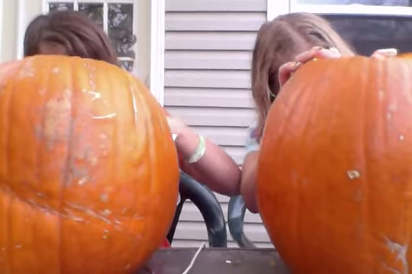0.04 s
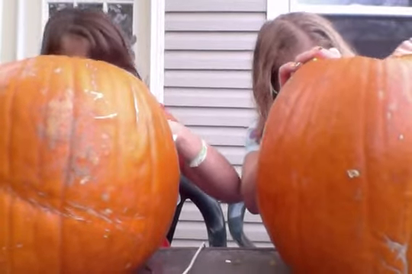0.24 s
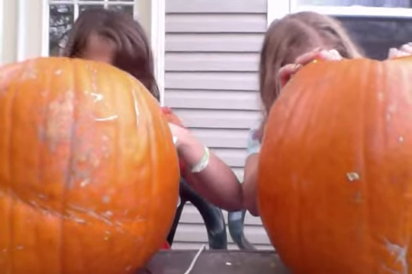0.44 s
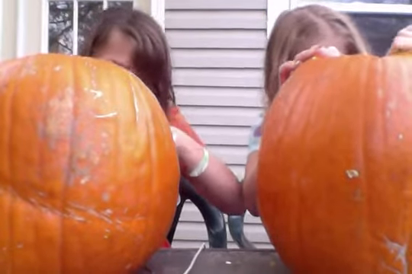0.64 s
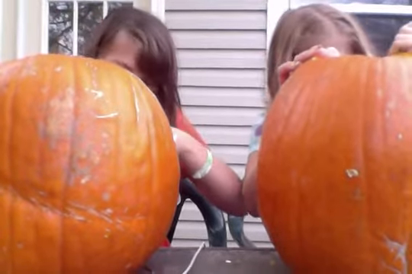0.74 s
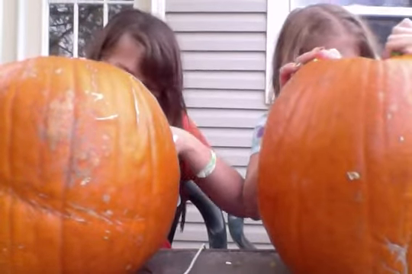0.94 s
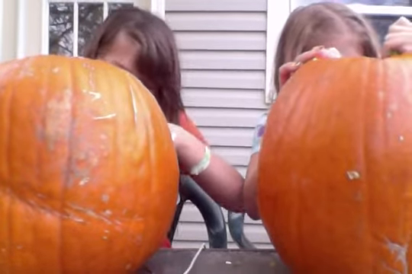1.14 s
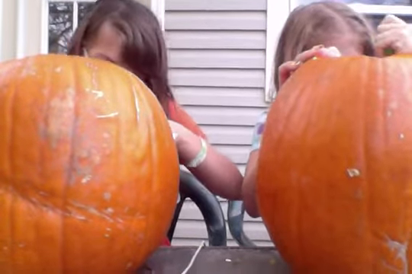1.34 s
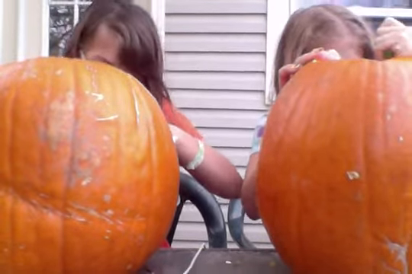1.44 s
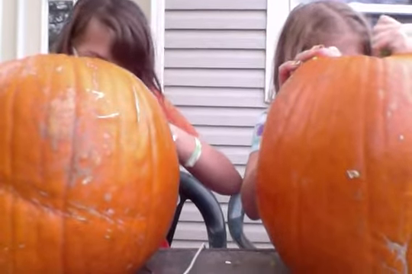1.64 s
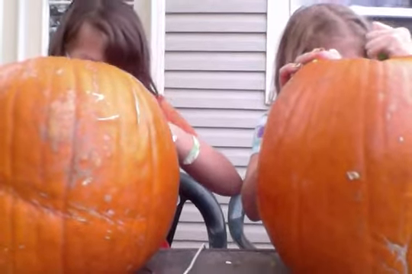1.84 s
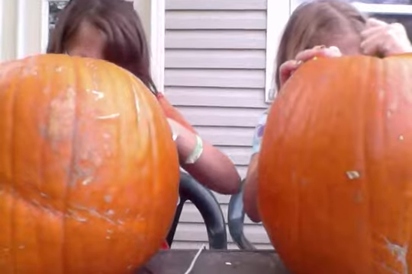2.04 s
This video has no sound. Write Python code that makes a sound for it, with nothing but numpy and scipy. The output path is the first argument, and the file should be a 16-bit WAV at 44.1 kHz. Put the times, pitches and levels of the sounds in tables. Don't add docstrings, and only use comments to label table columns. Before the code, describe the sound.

A knife cuts into a hollow pumpkin, close, outdoors. Soft air and a faint press open; at 0.2 s a round thump leads into dense bright knocks and wet tearing until 0.4. A double knock falls at 0.6, then near quiet. Low thumps and light knocks come at 1.1-1.3, two knocks with a thin faint squeak around 1.45, a hollow push at 1.65, and final knocks at 1.73-1.85.

```python
import sys
import numpy as np
from scipy import signal
from scipy.fft import rfft, irfft
from scipy.io import wavfile
from scipy.ndimage import uniform_filter1d

SR = 44100
rng = np.random.default_rng(int(sys.argv[2]) if len(sys.argv) > 2 else 0)


def master_out(mix):
    frames = np.transpose(np.atleast_2d(mix))
    ceiling = np.clip(frames, -1, 1)
    pcm = np.round(ceiling * 32767).astype(np.int16)
    wavfile.write(sys.argv[1], SR, pcm)


def boost(x):
    u = np.asarray(x, float) / 20
    return 10 ** u


N = 92610


def evened(x):
    return x / np.sqrt(np.mean(x ** 2) + 1e-20)


def wander(count, smooth):
    return evened(uniform_filter1d(rng.standard_normal(count), smooth))


def add(mix, start_s, sound):
    part = mix[round(start_s * SR):][:len(sound)]
    part += sound[:len(part)]


def colour(x, points, edge_hz=2e4):
    hz = np.fft.rfftfreq(len(x), 1 / SR) + 1
    f, db = np.transpose(points)
    shape = np.interp(np.log(hz), np.log(f), db, -120)
    fall = -63 * np.maximum(np.log2(hz / edge_hz), 0)
    return irfft(rfft(x) * boost(shape + fall), len(x))


def resonate(x, hz, width_hz):
    turn = np.exp(2j * np.pi * np.cumsum(hz * np.ones(len(x))) / SR)
    r = np.exp(-np.pi * width_hz / SR)
    return 2 * (turn * signal.lfilter([1 - r], [1, -r], x / turn)).real


# [f/Hz, density/dB per Hz]
AIR_SPECTRUM = [(15, -84), (25, -15), (148, 4.5), (648, -5.5), (762, -3), (1080, -6), (1750, -6),
                (5140, -12.5), (15500, -39)]
# [t/s, level/dB]
BREEZE_DRIFT = [(0, -1.5), (.17, -5), (.5, 1), (.75, 0), (1.2, -3), (1.6, 0), (2.1, -2.5)]


def air():
    swell = boost(0.5 * wander(N, 3000))
    drift_db = np.interp(np.arange(N) / SR, *np.transpose(BREEZE_DRIFT))
    return boost(-64 + drift_db) * swell * evened(colour(rng.standard_normal(N), AIR_SPECTRUM))


def porch(x):
    level_db, t60_s = -22, 0.54
    t = np.arange(30000) / SR
    tail = rng.standard_normal(30000) * np.minimum(t / 0.01, 1) * boost(-60 * t / t60_s)
    return boost(level_db) * signal.fftconvolve(x, tail / np.linalg.norm(tail))[:N]


# [t/s, level/dB]
HAND_PRESSURE = [(0, -63.5), (.07, -53.5), (.12, -67), (.2, -76), (0.229, -44), (.34, -45.5), (.38, -64),
                 (.6, -58.5), (.95, -77.5), (1.1, -56.5), (1.202, -82), (1.252, -45), (1.316, -46.5),
                 (1.39, -64), (1.55, -55), (1.63, -64.5), (1.75, -47.5), (2.05, -76.5)]
# [f/Hz, width/Hz, level/dB]
TABLE_MODES = [(92.8, 44, -11), (142, 78, -1), (200, 73, 0), (288.6, 33, -5.5), (383, 164, -4),
               (503, 56, -12.5)]


def rumble():
    t = np.arange(N) / SR
    s, db = np.transpose(HAND_PRESSURE)
    lumps = boost(2.0 * wander(N, 500))
    drive = rng.standard_normal(N) * lumps
    body = 0
    for hz, width_hz, level_db in TABLE_MODES:
        mode = resonate(resonate(drive, hz, width_hz), hz, 1.4 * width_hz)
        body = body + boost(level_db) * evened(mode)
    return boost(np.interp(t, s, db)) * evened(body)


# [start t/s, rise/s, level/dB, centre f/Hz]
HAND_BRUSHES = [
    (.05, 0.018, -83.5, 8140),
    (0.496, 0.035, -69.5, 7900),
    (.57, 0.13, -71.5, 4500),
    (0.642, 0.029, -68.5, 8100),
    (0.81, 0.027, -95, 7900),
    (1.27, 0.027, -72, 7400),
]


def brush(start_s, rise_s, db, hz):
    t = np.arange(12000) / SR
    hiss = resonate(resonate(rng.standard_normal(12000), hz, 6500), hz, 6500)
    fade_db = -60 * (t - rise_s).clip(0) / 0.36
    return start_s, boost(db + fade_db) * np.minimum(t / rise_s, 1) * evened(hiss)


# [middle t/s, length/s, peak
# level/dB, f/Hz]
SHELL_ROCKS = [(.41, 0.011, -43.5, 440), (.5965, 0.013, -38, 448), (.617, 0.021, -47.5, 333),
               (.637, 0.02, -49, 400), (.641, 0.012, -50, 1060), (.651, 0.014, -53, 483),
               (.657, .014, -56, 1000), (1.437, 0.016, -42.5, 482), (1.805, 0.015, -46, 420),
               (1.005, 0.017, -64, 222), (1.04, 0.032, -56, 214), (1.06, .025, -56, 192),
               (1.078, 0.015, -57, 240), (1.096, 0.031, -46.5, 227), (1.129, 0.032, -51.5, 158),
               (1.146, 0.027, -51, 270), (1.175, 0.034, -58, 180), (1.273, 0.014, -36, 258),
               (1.742, 0.017, -35.5, 233), (1.762, 0.031, -38, 251)]


def rock(middle_s, length_s, db, hz):
    t = np.arange(round(length_s * SR)) / SR
    swell = np.sin(np.pi * t / length_s) ** 2
    return middle_s - length_s / 2, boost(db) * swell * np.cos(2 * np.pi * hz * (t - length_s / 2))


# [t/s, f/Hz, level/dB]
BLADE_SQUEAK = [
    (1.405, 3320, -80),
    (1.423, 3386, -53),
    (1.441, 3480, -62),
    (1.49, 3430, -58),
    (1.551, 3330, -67),
    (1.562, 3330, -82),
    (1.621, 3210, -72),
    (1.665, 3190, -72),
    (1.68, 3200, -74),
]


def squeak():
    t = np.arange(N) / SR
    s, hz, db = np.transpose(BLADE_SQUEAK)
    waver = 1 + 0.13 * wander(N, 150)
    level = boost(np.interp(t, s, db, -140, -140))
    turns = np.cumsum(np.interp(t, s, hz)) / SR
    return np.sqrt(2) * waver * level * np.sin(2 * np.pi * turns)


# [start t/s, level/dB, f/Hz, t60/s]
SHORT_TICKS = [(.318, -32.5, 5650, 0.037), (.319, -33, 1612, 0.074), (.3845, -32, 3264, 0.034),
               (.4028, -32, 3450, 0.023), (.305, -60, 8500, .08), (1.278, -39.5, 2900, 0.024),
               (.528, -69, 11000, 0.054), (.663, -61.5, 9620, 0.056), (.992, -63, 7400, .02),
               (1.012, -59, 6950, 0.029), (1.019, -63, 7700, 0.018), (1.018, -71, 5700, 0.028),
               (0.97, -78, 5540, .02), (1.111, -57.5, 5900, 0.021), (1.533, -62.5, 5900, 0.054),
               (1.7345, -52, 4750, .04), (1.7328, -35, 3800, 0.019), (1.7745, -40, 3460, .015),
               (.2408, -42, 3500, 0.013), (.3205, -33.5, 1900, .02), (0.25, -26.5, 3350, .012),
               (.3018, -31, 2900, .015), (.592, -38, 2280, 0.037), (1.2648, -36, 3400, 0.019),
               (1.4622, -39, 3600, 0.019), (.603, -42.5, 1200, 0.047), (1.295, -45, 2000, .03),
               (1.799, -53, 3400, 0.028), (1.829, -45.5, 3280, 0.024)]


def tick(start_s, db, hz, t60_s):
    t = np.arange(4000) / SR
    return start_s, boost(db - 60 * t / t60_s) * np.minimum(t / 0.0012, 1) * np.sin(2 * np.pi * hz * t)


# [start t/s, level/dB, centre f/Hz, t60/s]
SKIN_SPLITS = [
    (.2893, -55.5, 10100, 0.037),
    (.2945, -57, 14000, .04),
    (.2905, -41, 5000, .03),
    (.3185, -45, 5600, 0.027),
    (.381, -57, 5000, .04),
    (.403, -59, 4900, .03),
    (.3165, -59, 11500, .04),
    (.322, -56, 11000, 0.045),
    (1.276, -68, 8300, .02),
    (1.089, -69, 7900, .02),
]


def split(start_s, db, hz, t60_s):
    t = np.arange(4000) / SR
    hiss = resonate(resonate(rng.standard_normal(4000), hz, 0.4 * hz), hz, 0.4 * hz)
    hiss = colour(hiss, [(1, 0), (2e4, 0)], 14500)
    return start_s, boost(db - 60 * t / t60_s) * np.minimum(t / 0.00053, 1) * evened(hiss)


# [start t/s, length/s, level/dB, top edge f/Hz]
TEAR_STROKES = [(.2845, 0.0067, -34, 5940), (.2897, 0.0095, -36, 8900), (.306, 0.0065, -54, 6000),
                (.3165, 0.0062, -36.5, 7200), (.321, 0.0033, -42, 8000), (.337, 0.0094, -49, 7500),
                (.380, 0.011, -44, 5700), (.402, 0.0068, -44, 5240), (.59, 0.016, -48, 4200),
                (1.111, 0.011, -67, 8200), (1.287, 0.022, -57, 5300), (1.571, 0.0092, -62, 5070),
                (1.733, 0.0099, -46, 4700), (1.852, 0.0054, -60, 3820)]
# [f/Hz, density/dB per Hz]
TEAR_SPECTRUM = [(290, -5), (500, -16), (1390, -12), (1630, -7), (2500, -10.5), (2920, -10), (3320, -14.5),
                 (3720, -10.5), (15000, -34.5)]


def tear(start_s, length_s, db, edge_hz):
    rise_s, t60_s, fibres_per_s = 0.0011, 0.065, 4400
    t = np.arange(6000) / SR
    noise = rng.standard_normal(6000)
    strength = boost(0.97 * rng.exponential(1, 6000).clip(0, 3))
    snaps = noise * (1.2 + strength * (rng.random(6000) < fibres_per_s / SR))
    clumps = boost(3.5 * wander(6000, 70))
    shape = np.minimum(t / rise_s, 1) * boost(-60 * (t - length_s).clip(0) / t60_s)
    return start_s, boost(db) * shape * evened(colour(clumps * snaps, TEAR_SPECTRUM, edge_hz))


# [start t/s, peak level/dB, f/Hz, rebound/0-1]
SHELL_PUSHES = [
    (.069, -39.5, 180.4, 0.3),
    (.2112, -25, 369, 0.8),
    (1.111, -38.5, 365, 0.63),
    (1.2342, -26.5, 363, 0.34),
    (1.2955, -30.5, 229.6, 0.1),
    (1.311, -35.5, 200, 0.3),
    (1.527, -40, 303, 0.12),
    (1.573, -42, 322, 0.37),
    (1.6495, -30, 357.4, 0.77),
]
# [multiple of f, level/dB]
SHELL_OVERTONES = [(1.398, -10.5), (1.9, -22), (2.4, -20.5)]


def push(start_s, db, hz, rebound):
    rise_s, fall_s, sag = 0.0036, 0.0024, 0.049
    rebound_s, rebound_db, rebound_wide_s = 0.0187, 0.5, 0.00072
    t = np.arange(3000) / SR
    rise = np.sin(np.pi / 2 * t / rise_s) ** 2
    fall = np.exp(-((t - rise_s) / fall_s / 2) ** 2)
    shape = np.where(t < rise_s, rise, fall)
    u = (t - rebound_s) / rebound_wide_s
    bounce = boost(rebound_db) * (1 - 0.5 * u ** 2) * np.exp(-0.3 * u ** 2) * rebound
    turns = np.cumsum(hz * (1 + sag * (1 - t / rise_s).clip(-1))) / SR
    overtones = 0
    for multiple, level_db in SHELL_OVERTONES:
        ring = np.sin(2 * np.pi * multiple * hz * t)
        overtones = overtones + boost(level_db - 60 * t / 0.088) * np.minimum(t / 0.0045, 1) * ring
    return start_s, boost(db) * (bounce - shape * np.sin(2 * np.pi * turns) - overtones)


def bending_wave(t, db):
    start_hz, end_hz, glide_s, t60_s = 3700, 2000, 0.0025, 0.05
    turns = np.cumsum(end_hz + (start_hz - end_hz) * np.exp(-t / glide_s)) / SR
    return boost(db - 1 - 60 * t / t60_s) * np.minimum(t / 0.00055, 1) * np.sin(2 * np.pi * turns)


def scatter(rings, t):
    echoes = rng.standard_normal(6000) * boost(-60 * t / 0.098) * (rng.random(6000) < 0.06)
    echoes = signal.lfilter(*signal.butter(2, 2400, fs=SR), echoes / np.linalg.norm(echoes))
    return boost(0.5) * signal.fftconvolve(rings, echoes)[:len(rings)]


# [t/s, peak level/dB, hollow level/dB, brightness/dB per octave, bending level/dB]
BLADE_KNOCKS = [(0.2404, -28, -2.5, 4, 0), (0.2518, -29, -1.5, -5.5, -4), (0.2745, -26.5, -3.5, 6, -2),
                (0.2848, -19, -9.5, 21, -5), (0.2934, -18.5, -12.5, 17, -2), (.2975, -20.5, -10.5, 15, -5),
                (0.3014, -25, -8.5, 8, -9), (0.3197, -26, -5, -11, 0), (0.3843, -25.5, -28, 20, -6),
                (0.3879, -33, -20, 0, -5), (0.4026, -26.5, -7, 9, -6.5), (0.5897, -24, -4, -5, 1),
                (0.5991, -26, -5, 0, -1.5), (1.1134, -46, 0, -1, 2.5), (1.246, -49, -9, -9, -2),
                (1.2647, -31, -10, -2, 3), (1.2785, -36.5, -2.5, 10, -1), (1.2858, -42, -2, -14, 0),
                (1.2957, -41, -2, -18, 3), (1.429, -30, 1, -1, -1), (1.4623, -29, -1.5, -3, 0.5),
                (1.571, -49.5, 6, -7, 0), (1.6773, -35.5, -0.5, -3, 1), (1.6853, -37, -3.5, -10, 2.5),
                (1.7326, -23.5, -1, -7.5, 2), (1.7415, -34, 5.5, -9.5, -3), (1.7743, -31.5, -2, -5, -2),
                (1.7991, -45, 8, 0, 2), (1.8214, -36, -2.5, -4, -3), (1.8527, -58, 2, -7, 1)]
# [f/Hz, level/dB, t60/s]
RIND_MODES = [(280, -5.5, 0.11), (372, -5.5, 0.097), (488.4, -3, 0.088), (604, -5.5, 0.07),
              (905, -11, 0.072), (1031, -7, 0.097), (1276, -9, 0.04), (1779, -0.5, 0.025),
              (1964, -10.5, 0.05), (2259, -2, 0.033), (2565, -17, 0.1), (3078, -1.5, 0.027),
              (3401, 2, 0.021), (3873, -13, 0.042)]


def knock(start_s, db, hollow_db, bright_db, bend_db):
    spread_s, spread_slope, latest_s = 0.0008066, 2.8, 0.00457
    split_hz, detune, pair_gap = 1400, 0.05, 0.053
    t = np.arange(6000)[:, None] / SR
    hz, level, t60 = np.transpose(RIND_MODES)
    hollow = hz < split_hz
    level_luck, gap_luck, pair_luck, tune_luck, phase_luck = rng.random((5, len(RIND_MODES)))

    rise = np.minimum(spread_s * (3400 / hz) ** spread_slope, latest_s)
    tilt = np.where(hollow, hollow_db, bright_db * np.log2(hz / 3400))
    level = level + tilt + 3.6 * (level_luck - 0.5)
    swell = (1 - np.exp(-(t / rise) ** 2)) * boost(level - 60 * t / t60)

    tuned_hz = hz * (1 + detune * (2 * tune_luck - 1) * hollow)
    turn = 2 * np.pi * tuned_hz * (t - rise) + 2 * np.pi * phase_luck * hollow
    gap = pair_gap * (1 + hollow) * (2 * gap_luck - 1)
    partner = np.sin(turn * (1 + gap) + 2 * np.pi * pair_luck)
    rings = (swell * (np.sin(turn) + 0.82 * partner)).sum(1)

    t = t[:, 0]
    rings = rings + bending_wave(t, bend_db)
    rings = rings + scatter(rings, t)
    return start_s - 0.0005, boost(db - 12.0) * rings


def scene():
    knife = squeak()
    for table, source in ((HAND_BRUSHES, brush), (SHELL_ROCKS, rock), (SHORT_TICKS, tick), (SKIN_SPLITS, split),
                          (TEAR_STROKES, tear), (SHELL_PUSHES, push), (BLADE_KNOCKS, knock)):
        for row in table:
            add(knife, *source(*row))
    return (air() + rumble() + knife + porch(knife))[None]


def low_pass(x):
    return signal.sosfilt(signal.butter(12, 15700, fs=SR, output="sos"), x)


def record(dry):
    thin = signal.sosfilt(signal.butter(2, 73.5, "high", fs=SR, output="sos"), dry)
    return low_pass(thin)


dry = scene()
out = record(dry)
master_out(out)
```